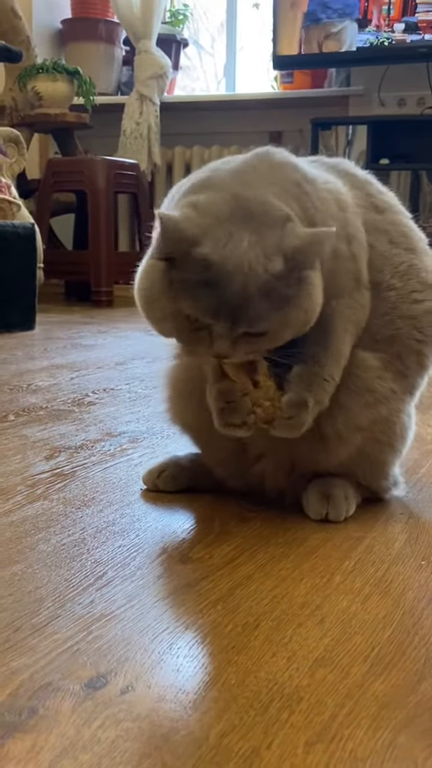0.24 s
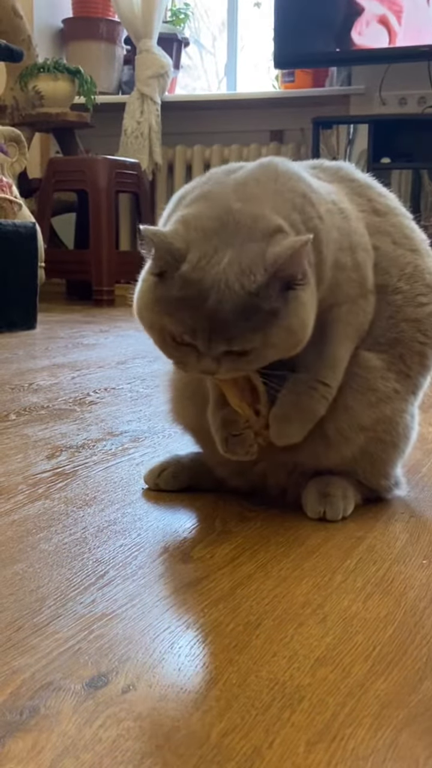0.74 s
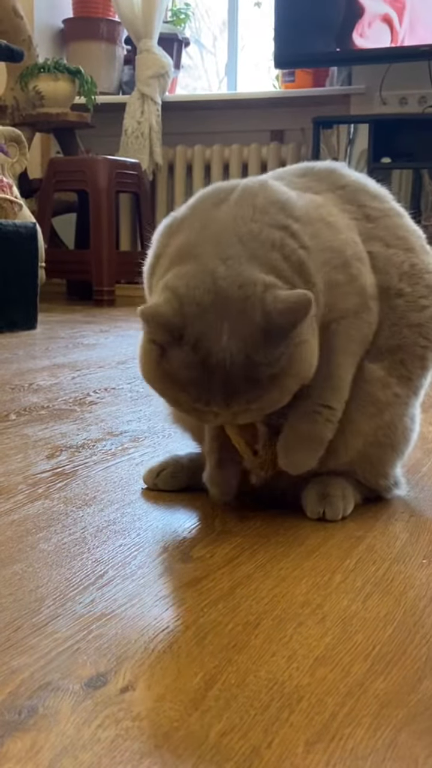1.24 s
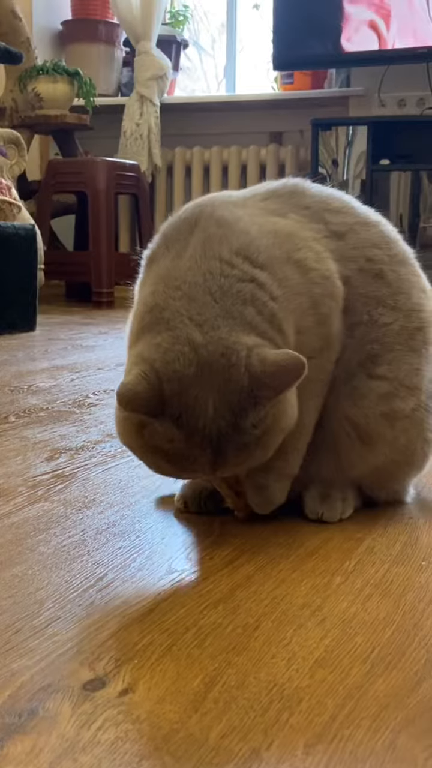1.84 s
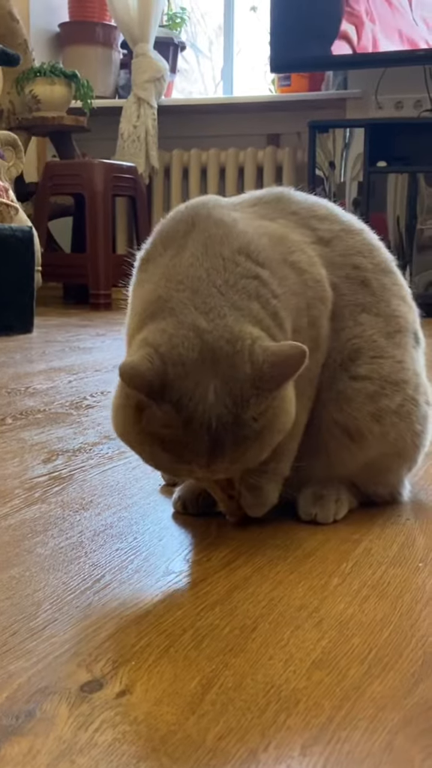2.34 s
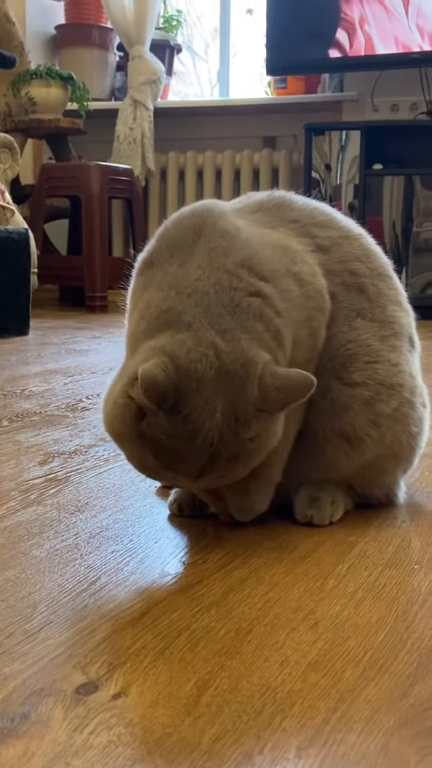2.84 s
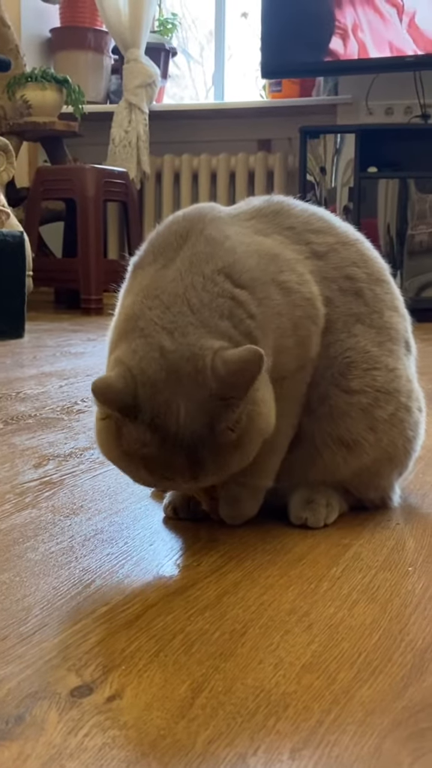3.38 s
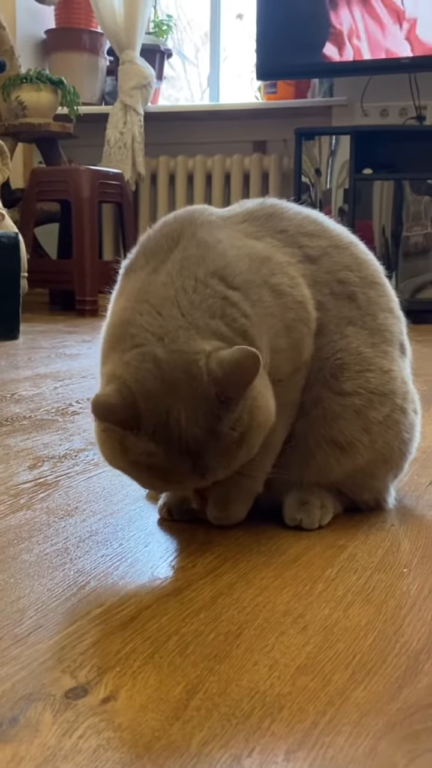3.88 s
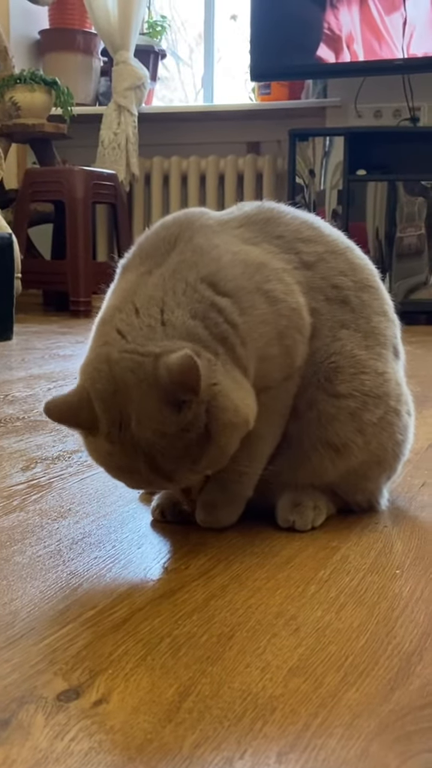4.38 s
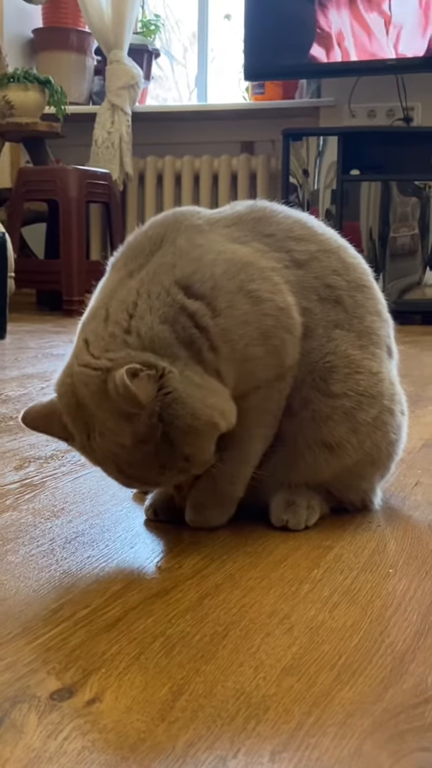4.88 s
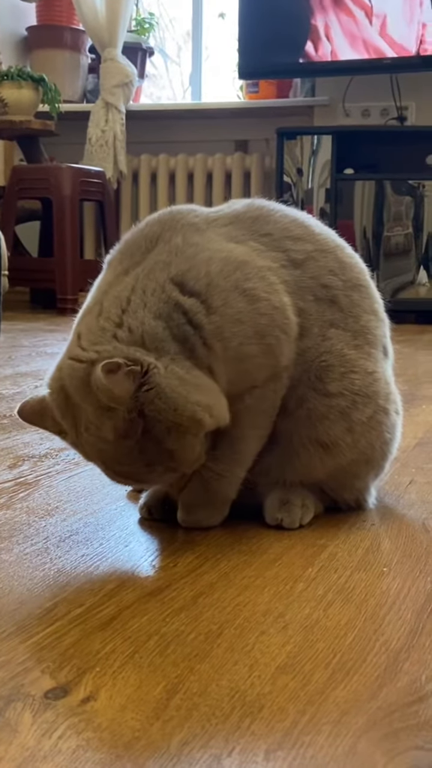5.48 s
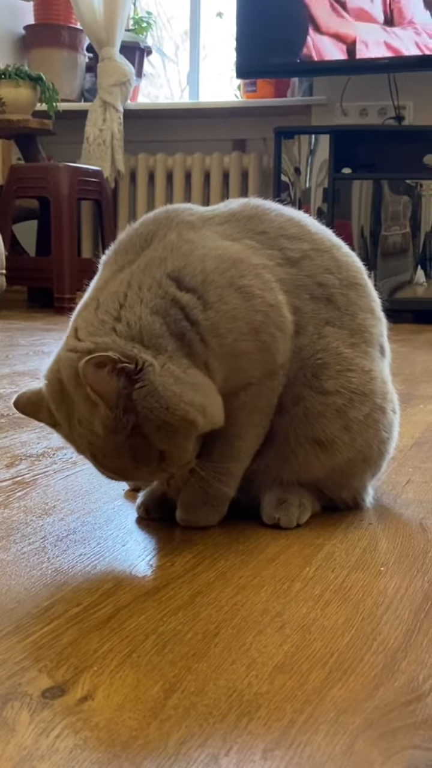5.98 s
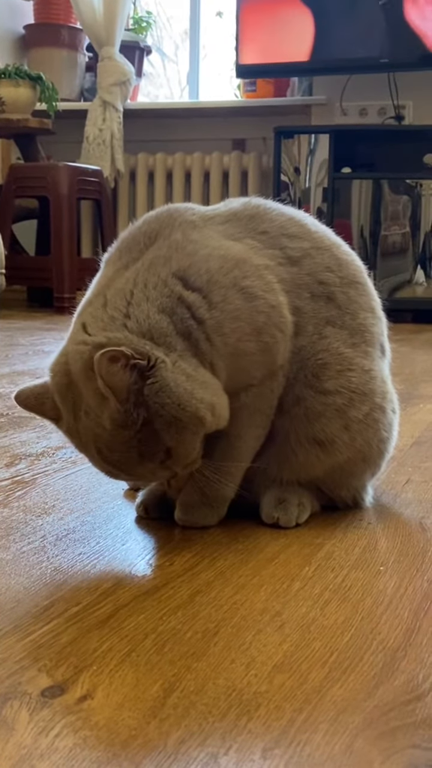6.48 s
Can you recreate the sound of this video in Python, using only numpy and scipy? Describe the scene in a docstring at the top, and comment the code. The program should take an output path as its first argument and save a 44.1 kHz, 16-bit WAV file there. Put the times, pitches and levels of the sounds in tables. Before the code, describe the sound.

Irregular brittle snaps and soft grinding of a cat chewing something hard in a quiet living room, a distant engine rumbling faintly beneath.

```python
"""In a furnished living room with a wooden floor, a cat gnaws a hard dried treat.
Each snap is an impulse and a brief train of fractures exciting jaw, mouth, treat, teeth and splinter modes.
Crumbs grind as dense random grains in short resonators, above a faint rustle of fur made the same way.
Below lie shaped room noise, hum of narrow noise bands, and a far engine of three harmonics changing speed.
Two close ports hear the cat directly, by early echoes and by a diffuse tail."""
import sys
import numpy as np
from scipy import signal
from scipy.fft import rfft, irfft, next_fast_len
from scipy.io import wavfile

SR = 44100
rng = np.random.default_rng(int(sys.argv[2]) if len(sys.argv) > 2 else 0)


def master(y):
    """Save y as 16-bit WAV."""
    cut = np.clip(np.atleast_2d(y).T, -1, 1)
    pcm = np.round(cut * 32767)  # scale
    wavfile.write(sys.argv[1], SR, pcm.astype(np.int16))


N = 296440

# Snaps of the treat. Each row: time in seconds, direct peak in dB of jaw, mouth, treat, teeth and splinter
# before the ports, pitch in Hz of mouth, treat and teeth, duration of the small fractures in ms.
SNAPS = [(0.214, -57.5, -81, -82, -73, -68, 970, 1960, 5000, 4.9),
         (0.4802, -66, -68, -71, -53.5, -57, 910, 2194, 5060, 2.35),
         (0.523, -53, -82, -90.5, -62.5, -86, 980, 2160, 5360, 5),
         (0.539, -63.5, -70, -79, -62, -69, 1200, 2660, 5030, 4.4),
         (0.572, -69, -29.5, -28.5, -29.5, -33.5, 1290, 2230, 4970, 1.47),
         (0.575, -39.5, -38.5, -25, -27.5, -34, 774, 2670, 4030, 1.04),
         (0.9504, -81, -55, -52, -54.5, -56, 1410, 2120, 5660, 1.95),
         (0.953, -63, -51, -49, -55.5, -48, 1460, 2050, 4620, 1.12),
         (1.0387, -53.5, -44.5, -64, -80, -91, 1210, 1940, 4040, 1.07),
         (1.0485, -43, -42, -44.5, -65, -99, 1480, 3130, 5400, 1.58),
         (1.216, -59, -82, -75, -82, -93, 800, 2400, 4200, 5.5),
         (1.257, -63, -84, -63, -79, -80, 700, 3230, 3740, 4),
         (1.283, -61, -66, -53, -59, -61, 1400, 3240, 4870, 1.8),
         (1.296, -78, -67, -53, -59, -63, 1300, 3300, 5160, 6),
         (1.54, -42, -59, -38, -52.5, -67, 880, 3140, 5300, 1.01),
         (1.611, -59, -64, -56, -81, -86, 1140, 3200, 4320, 1.65),
         (1.623, -62, -49.5, -51.5, -78, -92, 1160, 2530, 3300, 1.6),
         (1.657, -90, -58, -55, -58, -70, 1480, 2930, 4460, 6.6),
         (1.6705, -50, -54, -47.5, -81, -82, 1280, 2290, 4000, 1.5),
         (2.1555, -98, -75, -85, -55.5, -64, 898, 3130, 4870, 1.7),
         (2.2923, -81, -81.5, -60, -82.5, -87.5, 1690, 2240, 4770, 2.5),
         (2.4259, -87, -77, -55.5, -58.5, -70, 1690, 3070, 4700, 1.27),
         (2.465, -74, -58, -55.5, -70.5, -77, 965, 2960, 4700, 8.8),
         (2.57, -70.5, -51, -59, -66, -80, 1260, 2555, 4740, 2.8),
         (2.5785, -28, -22.5, -26.5, -19.5, -21, 1230, 2920, 4510, 1.5),
         (2.582, -46, -34.5, -59, -29.5, -55, 1150, 2920, 4200, 2.1),
         (2.693, -44, -29.5, -24.5, -28, -34.5, 1370, 3520, 4600, 1.45),
         (2.6972, -46, -44.5, -43, -37.5, -32, 890, 1980, 4000, 1.9),
         (2.781, -78, -53, -38.5, -34, -29, 1500, 3320, 5400, 1.26),
         (2.783, -46.5, -36.5, -40, -29.5, -25.5, 1420, 3100, 5830, 1.52),
         (2.958, -79, -70, -60.5, -62, -72, 1500, 2900, 5000, 1.3),
         (3.1551, -87, -80.5, -62.5, -56, -75, 1500, 2860, 5230, 1.1),
         (3.337, -50, -58, -50, -58, -78, 1140, 2030, 3220, 1.55),
         (3.676, -82, -71, -59.5, -68, -88.5, 1500, 2250, 4840, 2.2),
         (3.7492, -63.5, -76.5, -61.5, -78, -85, 751.5, 3220, 4340, 1.8),
         (3.757, -58.5, -82.5, -85, -79.5, -83, 695, 2660, 4360, 2.8),
         (4.3, -76, -69, -60, -77, -91, 1810, 2760, 3650, 1.47),
         (4.3313, -72, -83, -55, -51.5, -84, 1460, 2970, 4670, 1.3),
         (4.364, -58, -47.5, -64, -58, -85, 1150, 1900, 3830, 1.58),
         (4.428, -84, -73, -62, -65, -89, 1300, 2386, 4430, 1.5),
         (4.705, -79, -62, -51, -54.5, -65.5, 1804, 3100, 4530, 1.3),
         (4.842, -84.5, -80, -68, -65.5, -63, 1500, 2970, 5200, 1.4),
         (4.8949, -43, -39, -27, -27, -31.5, 1170, 2900, 4810, 1.27),
         (4.9987, -52, -33, -22.5, -22.5, -17.5, 1240, 3580, 4600, 2.34),
         (5.003, -26, -21.5, -17, -8, -14, 970, 2900, 4540, 1.1),
         (5.345, -85.5, -84, -68.5, -60.5, -79, 1500, 2900, 4500, 2.2),
         (5.228, -89.5, -89, -83.5, -72, -67, 1500, 2890, 4500, 1.5),
         (5.366, -86.5, -80, -72, -64, -80, 1510, 2900, 4430, 2.2),
         (5.3851, -85.5, -74.5, -50.5, -55.5, -63, 1193, 1840, 3850, 1.4),
         (5.4544, -75, -56, -40.5, -37.5, -38.5, 1310, 3110, 5200, 1.58),
         (5.4748, -79.5, -60, -65, -54, -63, 1600, 3230, 4500, 1.4),
         (5.4844, -79, -58, -55, -55, -44, 1673, 3150, 4780, 1.13),
         (5.495, -70, -68, -81.5, -81.5, -90, 846, 2480, 4500, 10.4),
         (5.7142, -84, -88, -61, -55.5, -71, 1507, 2750, 4790, 1.96),
         (5.734, -61.5, -74, -49, -50.5, -76, 849, 2810, 4440, 1.55),
         (5.797, -70, -63.5, -63, -71, -85, 1700, 2400, 4500, 3),
         (5.9121, -59.5, -53, -34.5, -32, -32, 1373, 3560, 4650, 1.1),
         (5.937, -85, -56, -70.5, -74.5, -78.5, 1750, 2400, 4550, 2.2),
         (6.696, -71, -56, -48, -61, -83, 1770, 3170, 3900, 1.4)]
# Modes of the jaw. Each row: frequency in Hz, relative level in dB, decay time t60 in seconds.
JAW_MODES = [(237, -8, 0.011), (401, 2, 0.0088), (602, 5, 0.0064)]
# Modes of the mouth. Each row: ratio to the snap's mouth pitch, relative level in dB, t60 in seconds.
MOUTH_MODES = [(1.001, 4, 0.0066), (1.75, -6, 0.0035)]
# Modes of the treat. Each row: ratio to the snap's treat pitch, relative level in dB, t60 in seconds.
TREAT_MODES = [(.78, -8, 0.004), (1.001, 2, 0.0054), (1.11, -9, 0.0045)]
# Modes of the teeth. Each row: ratio to the snap's teeth pitch, relative level in dB, t60 in seconds.
TEETH_MODES = [(0.86, -6, 0.0037), (0.999, 1.5, 0.0045), (1.25, -10.5, 0.002)]
# Modes of the splinters. Each row: frequency in Hz, relative level in dB, t60 in seconds.
SPLINTER_MODES = [(6247, 1.2, 0.0007), (9200, -1.4, 0.00063), (12600, -3.5, 0.001), (15620, -6.5, 0.0015)]
# Delay in ms with which jaw, mouth, treat, teeth and splinters are set ringing, in that order.
BODY_DELAY_MS = [.6, .25, 0.028, 0.022, 0.093]
# Bouts of grinding. Each row: start in seconds, hold in seconds, relative level in dB, wet, coarse and
# fine grains in dB against it, pitch of the medium grains in Hz, their spread in octaves.
GRIND_BOUTS = [(0.2, 0.026, -96, 13, 5, -10, 2220, 0.19), (0.23, 0.09, -103, 3, 8, 16, 2220, 0.26),
               (0.456, 0.064, -82.5, -10, -5, 3.5, 2200, 0.22),
               (0.579, 0.098, -57, -41, -27, -25, 3080, 0.46),
               (0.732, 0.13, -75.5, -25, -11, -13.5, 2960, 0.32),
               (1.055, 0.038, -71.5, -17, -2.5, -12, 2330, 0.28),
               (1.19, 0.032, -83.5, 12.5, 0, -25, 3080, .2), (1.25, 0.02, -89, 8, 3, -23, 3300, 0.18),
               (1.292, 0.02, -78, -12, -9, 2.5, 3340, 0.43), (1.56, 0.03, -74.5, 0, 5.5, -4.5, 2980, 0.22),
               (1.671, 0.024, -60, -25, -10, -24, 2440, 0.28),
               (1.704, 0.028, -67.5, -7, -6, -28, 2280, .16), (1.791, 0.07, -90, -14, -9, -8, 2200, 0.24),
               (2.173, 0.15, -88, -19, -21, -2, 2230, 0.19), (2.384, 0.11, -77, -13, -11, -8, 2900, 0.22),
               (2.59, 0.082, -70, -3, 3, 6.5, 2800, 0.44), (2.886, 0.11, -79.5, -24, -23, -11, 2680, 0.38),
               (3.345, 0.11, -77, -13, -17, -13, 2820, 0.23), (3.552, 0.039, -91.5, 8.5, -4, -14, 2200, .3),
               (3.634, 0.1, -85.5, -14, -15, -12.5, 2123, .25), (3.755, 0.035, -86, 12, -5, -11, 2130, .3),
               (3.81, 0.11, -91, -8, -3.5, -21, 2150, .3), (4.355, 0.028, -77.5, -4, -5, -4, 2320, 0.5),
               (4.673, 0.11, -83.5, -25.5, -36, -4, 2440, 0.37),
               (5.11, 0.43, -83, -9, -16, -2.5, 2290, 0.43), (5.47, 0.08, -90.5, -8, -5, 12.5, 3300, 0.26),
               (5.718, 0.12, -82.5, -15, -12, -4, 2266, .3), (5.94, 0.09, -73.5, -26, -19, -17, 3970, 0.17),
               (6.681, 0.046, -84, -17, -16, -2.5, 2514, .3)]
# Grain resonances by size of grain. Each entry: lowest pitch in Hz, highest pitch in Hz, number of pitches.
GRAIN_HZ = {"wet": (420, 800, 3), "coarse": (900, 1600, 4), "medium": (1500, 3900, 11),
            "fine": (3900, 6017, 5), "dust": (8000, 15900, 4)}
# Far engine. Each row: time in seconds, firing rate in Hz, first order in dB rms, second order in dB rms,
# all before their wavering.
ENGINE = [(0.0, 48.8, -56, -59), (0.13, 47.4, -65, -66), (0.86, 45.0, -61.5, -67.5), (1.3, 41.2, -60, -75),
          (1.85, 42.7, -64.5, -59.5), (2.1, 43.8, -63.5, -48), (2.3, 43.9, -60, -55.5),
          (2.65, 44.6, -57.5, -61.5), (2.85, 45.13, -62, -51), (3.08, 46.5, -56, -53),
          (3.25, 49.3, -55, -63), (3.42, 52.1, -51.5, -67), (3.97, 62.5, -63.5, -77.5),
          (4.4, 66.6, -61, -87.5), (4.53, 73.4, -62.5, -62), (5.25, 73.5, -69.5, -71),
          (5.5, 54.5, -71, -78), (5.8, 40.5, -66.5, -63.5), (6.21, 45.3, -66.5, -58),
          (6.72, 49.5, -71, -70)]
# Room noise before its wavering. Each row: frequency in Hz, spectral density in dB per Hz.
AIR_SPECTRUM = [(25, -85.5), (42, -81.5), (110, -75.5), (200, -86), (400, -100), (700, -112), (1300, -116),
                (2500, -117), (5000, -121), (6500, -130), (8000, -131), (11000, -132), (13500, -144),
                (17000, -149)]
# Hum resonances. Each row: centre in Hz, bandwidth in Hz, level in dB rms before its wavering.
ROOM_HUM = [(151.3, 3, -61.5), (198, 8, -78.5), (265, 5.4, -87.5)]
# Reverberation time. Each row: frequency in Hz, t60 in seconds.
ROOM_T60 = [(300, 0.89), (1000, 0.62), (3000, 0.55), (4500, 0.71), (7000, 0.44), (11000, 0.53), (16000, .3)]
# Colour of the diffuse tail. Each row: frequency in Hz, gain in dB on the band-filtered noise.
TAIL_COLOUR = [(300, -1), (1000, -10.5), (2000, -11.5), (3000, -12.5), (4500, -15), (6000, -12),
               (11000, -6.5), (16000, -16)]
# Early echoes off floor, paws, furniture and wall. Each row: delay in ms, level in dB against the direct sound.
ECHOES = [(4.6, -24), (6.1, -22), (10, -26.5), (47, -25)]
# Phase between the ports. Each row: frequency in Hz, lead of left over right in radians.
PORT_PHASE = [(0, 0), (1100, .7), (1600, .2), (2500, .6), (3300, .2), (5100, .5), (7250, 3.14),
              (10300, 6.28), (13200, 9.42), (16600, 13)]
# Balance of the ports. Each row: frequency in Hz, left minus right in dB.
PORT_BALANCE = [(250, -1), (400, -0.5), (700, 6.5), (1300, 7), (2000, 0), (4000, 0.5)]
# Likeness of the room noise at the ports. Each row: frequency in Hz, correlation (later limited to -1 .. 0.99).
AIR_LIKENESS = [(50, 1.16), (150, 1.4), (250, 0.95), (400, 0.49), (700, -0.4), (1300, -1.8), (1900, 1),
                (3300, 1.6), (5800, 1.1), (7300, 1.9), (9500, 0.6), (13000, 1.5)]
# Likeness of the cat's diffuse tail at the ports. Each row: frequency in Hz, correlation (limited likewise).
TAIL_LIKENESS = [(250, 0.82), (600, 0.2), (1200, 0.05), (1900, 0.3), (3300, 1), (5000, .9), (8000, 1),
                 (13000, .9)]

SWELL = 0.17  # contact builds up with this share of each mode's decay time
TAIL_SHORTENING = 0.8  # decay time of the modes as sent to the tail, against the direct sound
FRACTURE_DB_AT_1_MS, FRACTURE_GROWTH = -21.5, 3.1  # median against the break; exponent of duration in ms
GRAINS_PER_S, GRAIN_CYCLES = 12000, 15  # rate before clumping; t60 of a grain in periods
PATCH_DB, DUST_DB = 3, -13.5  # coming and going of each pitch; dust against fine grains
GRIND_RISE_DB_PER_S, GRIND_FALL_DB_PER_S = 903.5, 346
SAG_OCT_PER_S = 1.1  # the medium grains sink in pitch as crumbs soften
RUSTLE_DB, RUSTLE_WAVER_DB = -94, 0.5
ENGINE_WAVER_DB, ENGINE_WAVERS_PER_S = 3, 14
ENGINE_THIRD_DB, ENGINE_JITTER_HZ = -11, 1.2  # third order against the second; unevenness of firing
RUMBLE_DB, RUMBLE_SWELL_DB, RUMBLE_SWELLS_PER_S = -3.5, 4.5, 4
AIR_WAVER_DB, AIR_FLICKER_DB = 2.5, 1.5  # slow and quick wavering in the octave above the rumble
STEADIER = .78  # share of that wavering kept per octave upward
HUM_WAVER_DB = 3.5
CUTOFF_HZ = 17050


def snaps():
    """Impulse excitation: a break amid smaller fractures rings five bodies; rows: to microphone, to room."""
    size = 1200
    out = np.zeros((2, N + size))
    ms = np.arange(size) * 1000 / SR
    chance = rng.standard_normal((len(SNAPS), 2, size))
    body_modes = (JAW_MODES, MOUTH_MODES, TREAT_MODES, TEETH_MODES, SPLINTER_MODES)
    for row, (push, uneven) in zip(SNAPS, chance):
        s, *peaks_db, mouth_hz, treat_hz, teeth_hz, fracture_ms = row
        # the break comes midway through the fractures
        click = 1. * (np.arange(size) == int(fracture_ms / 2000 * SR))
        fracture_gain = fracture_ms ** FRACTURE_GROWTH * from_db(FRACTURE_DB_AT_1_MS + 5.0 * uneven)
        fractures = fracture_gain * push * np.exp(-(ms / fracture_ms) ** 4)
        scales = (1, mouth_hz, treat_hz, teeth_hz, 1)
        bodies = zip(body_modes, scales, peaks_db, BODY_DELAY_MS, (-1, 1, 1, -1, 1))
        for modes, scale, peak_db, delay_ms, sign in bodies:
            near = body(click + fractures, modes, scale, 1)
            # over all directions the ripples of the fractures even out: the room hears the plain break
            far = body(click, modes, scale, TAIL_SHORTENING)
            peak = np.abs(signal.hilbert(near)).max()
            start = int((s + (delay_ms - fracture_ms * .75) / 1000) * SR)
            # a random start under 260 samples late keeps the bodies from cancelling in the tail
            far = np.roll(far, rng.integers(0, 260))
            out[:, start:start + size] += sign * np.array([near, far]) * from_db(peak_db) / peak
    return out[:, :N]


def body(x, modes, scale, short):
    """Modal superposition: parallel modes of alternating sign, each swelling softly before it decays."""
    out = 0
    for j, (ratio, db, t60) in enumerate(modes):
        hz, decay_s = scale * ratio, short * t60
        soft = ring(ring(x, hz, SWELL * decay_s), hz, SWELL * decay_s)
        out = out + (-1) ** j * from_db(db) * rms_one(ring(soft, hz, decay_s))
    return out


def grinding():
    """Shot noise: clumped grains of uneven strength are dealt to short resonances at many pitches."""
    chance = GRAINS_PER_S * from_db(3.0 * drift(30.0)) / SR
    strength = from_db(2.0 * np.minimum(rng.exponential(1, N), 4))
    grains = (rng.random(N) < chance) * strength * rng.choice([-1, 1], N)
    pitches = [(size, hz) for size, span in GRAIN_HZ.items() for hz in np.geomspace(*span)]
    dealt = rng.integers(0, len(pitches), N)
    out = 0
    for k, (size, hz) in enumerate(pitches):
        t60 = GRAIN_CYCLES / hz
        rung = ring(ring(grains * (dealt == k), hz, t60), hz, .5 * t60)
        patches = from_db(PATCH_DB * drift(12.0))
        out = out + .5 * bouts(size, hz) * patches * rms_one(rung)
    return out


def bouts(size, hz):
    """Amplitude envelope of one grain size and pitch: each bout rises, holds and fades, over fur rustle."""
    t = np.arange(0, N + 64, 64) / SR
    level = 0
    for s, hold_s, level_db, wet_db, coarse_db, fine_db, pitch_hz, spread_oct in GRIND_BOUTS:
        rise_db = -GRIND_RISE_DB_PER_S * np.clip(s - t, 0, None)
        fall_db = -GRIND_FALL_DB_PER_S * np.clip(t - s - hold_s, 0, None)
        off_oct = np.log2(hz / pitch_hz) + SAG_OCT_PER_S * np.clip(t - s, 0, hold_s)
        share = {"wet": from_db(wet_db), "coarse": from_db(coarse_db),
                 "medium": np.exp(-.5 * (off_oct / spread_oct) ** 2),
                 "fine": from_db(fine_db), "dust": from_db(fine_db + DUST_DB)}[size]
        level = level + from_db(level_db + rise_db + fall_db) * share
    rustle = from_db(RUSTLE_DB + DUST_DB * (size == "dust") + RUSTLE_WAVER_DB * drift(8.3))
    return np.interp(np.arange(N) / SR, t, level) + rustle


def at_microphone(near, far):
    """Room response: direct sound and early echoes, then a tail that builds up and decays band by band."""
    size = next_fast_len(N + SR)
    hz, t = np.fft.rfftfreq(size, 1 / SR), np.arange(SR) / SR
    early = 1 + sum(from_db(db) * np.exp(-2j * np.pi * hz * ms / 1000) for ms, db in ECHOES)
    white = rng.standard_normal((2, 2, SR))
    edges = 200 * 2 ** np.arange(0, 6.6, .5)  # half octaves in Hz
    tail = 0
    for k, (low, high) in enumerate(zip(edges, edges[1:])):
        band_filter = signal.butter(2, [low, high], "band", fs=SR, output="sos")
        band = signal.sosfilt(band_filter, white[k % 2])  # neighbouring bands use unrelated noise
        centre = np.sqrt(low * high)
        build_up = np.clip((t - .002) / 0.013, 0, 1)
        decay = from_db(-60 * t / at_hz(ROOM_T60, centre)) * build_up
        tail = tail + band * decay / np.sqrt(np.sum(decay ** 2)) * from_db(at_hz(TAIL_COLOUR, centre))
    direct = rfft(near, size) * ports(early)
    reverberant = rfft(far, size) * diffuse(*rfft(tail, size), TAIL_LIKENESS)
    return irfft(direct + reverberant, size)[:, :N]


def diffuse(one, other, likeness):
    """Diffuse-field correlation: two unrelated spectra are mixed to a given likeness of left and right."""
    alike = np.clip(at_hz(likeness, np.linspace(0, SR / 2, len(one))), -1, .99)
    return ports(one * np.sqrt((1 + alike) / 2), other * np.sqrt((1 - alike) / 2), level=False)


def ports(coherent, unrelated=0, level=True):
    """Interaural-style phase and level differences; a second, unrelated spectrum pulls the ports apart."""
    hz = np.linspace(0, SR / 2, len(coherent))
    turn = np.exp(.5j * np.interp(hz, *np.transpose(PORT_PHASE)))
    tilt = from_db(.5 * level * at_hz(PORT_BALANCE, hz))
    return np.array([(coherent + unrelated) * turn * tilt, (coherent - unrelated) / turn / tilt])


def engine():
    """Harmonic series: the first three firing orders, all that passes the walls, waver on a moving rate."""
    hz, first_db, second_db = in_time(ENGINE)
    phase = 2 * np.pi * np.cumsum(hz + ENGINE_JITTER_HZ * drift(7.0)) / SR
    out = 0
    for k, db in enumerate((first_db, second_db, second_db + ENGINE_THIRD_DB), start=1):
        waver_db = ENGINE_WAVER_DB * drift(ENGINE_WAVERS_PER_S)
        out = out + from_db(db + waver_db) * np.sin(k * phase)
    return np.sqrt(2) * out


def room_air():
    """Shaped random noise: octaves waver separately, the lowest swells, and narrow resonances hum."""
    hz = np.fft.rfftfreq(N, 1 / SR)
    noise = rfft(rng.standard_normal((2, N))) * from_db(at_hz(AIR_SPECTRUM, hz)) * np.sqrt(SR / 2)
    pair = diffuse(*noise, AIR_LIKENESS)
    octave = np.clip(np.log2((hz + 1) / 90), 0, 6)
    swell = from_db(RUMBLE_DB + RUMBLE_SWELL_DB * drift(RUMBLE_SWELLS_PER_S))
    air = irfft(pair * np.clip(1 - octave, 0, 1), N) * swell
    for k in range(1, 7):
        waver_db = AIR_WAVER_DB * drift(3.2) + AIR_FLICKER_DB * drift(13.0)
        band = irfft(pair * np.clip(1 - abs(octave - k), 0, 1), N)
        air += band * from_db(STEADIER ** (k - 1) * waver_db)
    for centre_hz, width_hz, db in ROOM_HUM:
        t60 = np.log(1000) / np.pi / width_hz
        hum = rms_one(ring(rng.standard_normal(N), centre_hz, t60))
        air += from_db(db + HUM_WAVER_DB * drift(2.3)) * hum
    return air


def ring(x, hz, t60):
    """Damped resonance: two poles decay by 60 dB in t60; zeros block the bottom and top of the spectrum."""
    r, w = from_db(-60 / (t60 * SR)), 2 * np.pi * hz / SR
    return signal.lfilter([.5, 0, -.5], [1, -2 * r * np.cos(w), r * r], x + 1e-18)


def drift(rate):
    """Slow random fluctuation of rms 1: lines between random knots, rate knots a second."""
    knots = rng.standard_normal(int(N / SR * 40) + 2)
    return rms_one(np.interp(np.arange(N) * rate / SR, np.arange(len(knots)), knots))


def from_db(db):
    """Logarithmic level: decibels to amplitude gain."""
    return 10 ** (np.asarray(db) / 20)


def rms_one(x):
    """Effective value: scale to rms 1."""
    return x / np.sqrt(np.mean(x ** 2) + 1e-30)


def in_time(rows):
    """Linear interpolation in time: table columns as sample-rate curves."""
    s, *columns = np.transpose(rows)
    return [np.interp(np.arange(N) / SR, s, c) for c in columns]


def at_hz(points, hz):
    """Logarithmic frequency scale: interpolate a spectrum along it."""
    table_hz, values = np.transpose(points)
    return np.interp(np.log(hz + 1), np.log(table_hz + 1), values)


def scene():
    """Linear superposition: the cat heard in the room, with room noise and engine."""
    return at_microphone(*(snaps() + grinding())) + room_air() + engine()


def record(dry):
    """Band limiting: the deepest bass and the top are cut."""
    bass_cut = signal.sosfilt(signal.butter(2, 30, "high", fs=SR, output="sos"), dry)
    return signal.sosfilt(signal.cheby2(12, 70, CUTOFF_HZ, fs=SR, output="sos"), bass_cut)


dry = scene()
out = record(dry)
master(out)
```